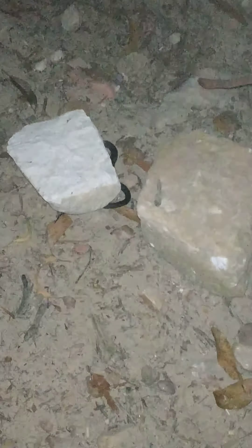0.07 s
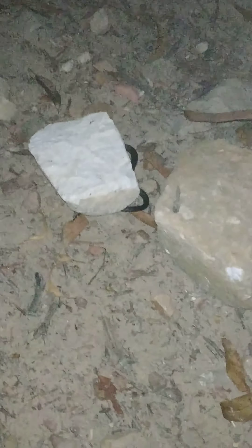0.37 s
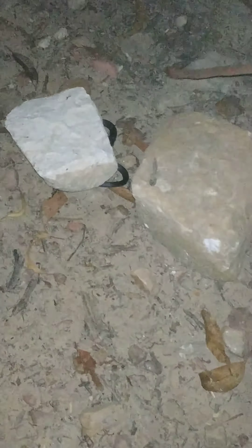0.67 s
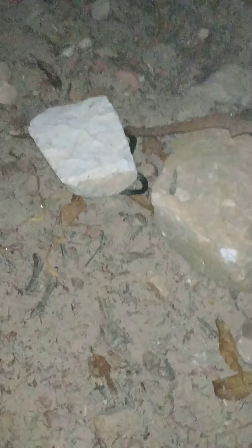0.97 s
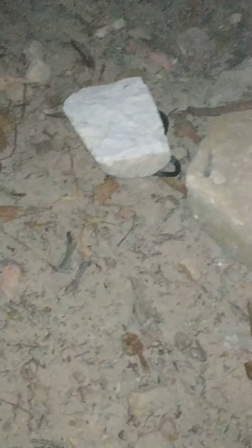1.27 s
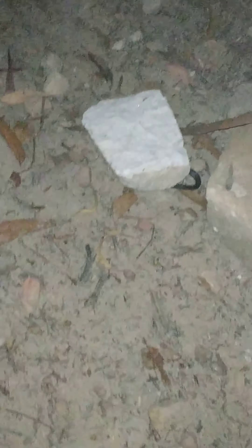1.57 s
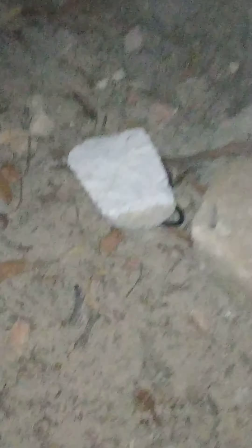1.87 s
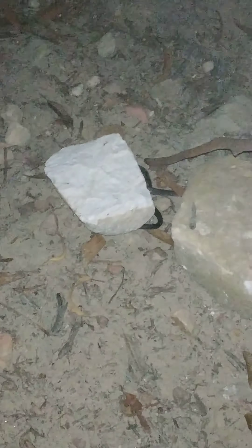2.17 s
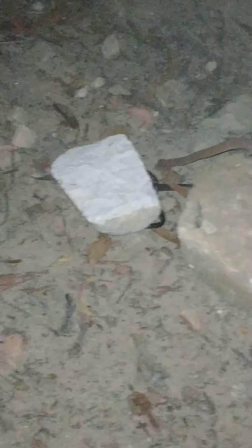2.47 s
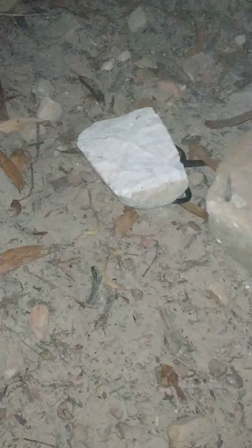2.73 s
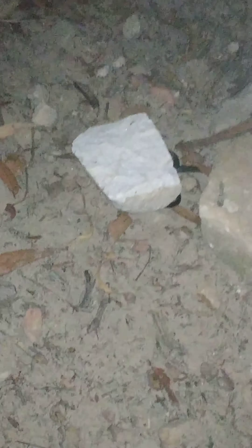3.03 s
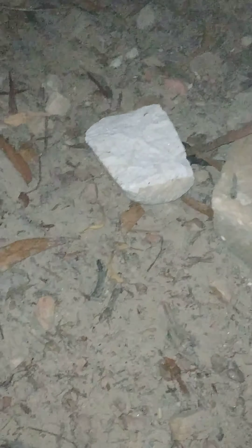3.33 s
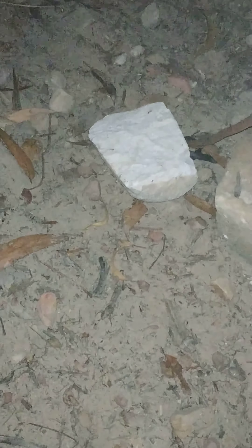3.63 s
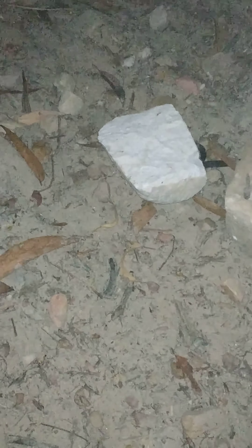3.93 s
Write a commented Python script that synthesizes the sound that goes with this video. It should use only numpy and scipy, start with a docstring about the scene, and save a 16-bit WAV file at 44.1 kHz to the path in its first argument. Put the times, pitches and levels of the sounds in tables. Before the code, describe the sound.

Night crickets trill in short pulses over a faint hum, then wind buffets the microphone.

```python
"""Night crickets on stony ground

One low cricket and several higher ones chirp over a far chorus, each wing stroke a short falling tone.
A distant motor drones under the quiet air. Close by come a few small clicks, two soft rustles and thin
squeaks; near the end a puff of wind buffets the microphone, mostly on the left."""
import sys
import numpy as np
from scipy import signal
from scipy.fft import rfft, irfft
from scipy.io import wavfile

SR = 44100
rng = np.random.default_rng(int(sys.argv[2]) if len(sys.argv) > 2 else 0)


def wrap_up_sound(samples):
    """Save the sound to the file named by the first command line argument, as 16-bit audio."""
    columns = np.atleast_2d(samples).T
    # keep every value between -1 and 1, then stretch to whole-number steps
    tamed = np.clip(columns, -1, 1)
    steps = np.round(tamed * 32767).astype(np.int16)
    wavfile.write(sys.argv[1], SR, steps)


N = 176400
TIME = np.arange(N) / SR


def from_db(db):
    """Decibels to gain."""
    return 10 ** (np.asarray(db) / 20)


def unit_rms(x):
    """Scale to unit power."""
    return x / np.sqrt(np.mean(x ** 2) + 1e-20)


def automation(rows):
    """Each column of a breakpoint curve at every sample."""
    times, *columns = np.transpose(rows)
    return [np.interp(TIME, times, column) for column in columns]


def at_hz(points, hz):
    """Read a spectrum on a log-frequency axis."""
    freqs, values = np.transpose(points)
    return np.interp(np.log(hz), np.log(freqs), values)


def pan(db):
    """Constant-power stereo gains; positive is left."""
    return unit_rms(from_db(np.array([[db], [-db]]) / 2))


def drift(rate_hz):
    """Smooth random modulation, spread 1."""
    hop, settle = 40, 2000
    pole = np.exp(-2 * np.pi * rate_hz * hop / SR)
    noise = rng.standard_normal(N // hop + settle + 2)
    slow = signal.lfilter([1], [1, -2 * pole, pole * pole], noise)[settle:]
    return np.interp(np.arange(N) / hop, np.arange(len(slow)), unit_rms(slow))


def band(x, hz, width_hz):
    """Band-pass around a centre."""
    edges = [hz - width_hz / 2, hz + width_hz / 2]
    return signal.sosfilt(signal.butter(2, edges, "band", fs=SR, output="sos"), x + 1e-18)


def phase_of(hz):
    """Running phase of a moving pitch."""
    return 2 * np.pi * np.cumsum(hz) / SR


def shaped_noise(spectrum, correlation=None):
    """Stereo noise with a given colour and left-right correlation; rms 1."""
    hz = np.maximum(np.fft.rfftfreq(N, 1 / SR), 1)
    mid, side = rfft(rng.standard_normal((2, N)))
    alike = at_hz(correlation, hz) if correlation else 0
    stereo = np.sqrt(1 + alike) * mid + np.sqrt(1 - alike) * side * [[1], [-1]]
    gain = from_db(at_hz(spectrum, hz)) * (hz > 10)
    return unit_rms(irfft(gain * stereo, N))


def glide(curve, wobble=0, harmonic=1):
    """A sine that follows a curve of pitch and level, silent outside it."""
    hz, db = automation(curve)
    gate = (TIME > curve[0][0]) & (TIME < curve[-1][0])
    phase = phase_of(hz * (1 + wobble * drift(120)))
    return gate * from_db(db) * np.sqrt(2) * np.sin(harmonic * phase)


# Colour of the air: f/Hz, relative level/dB
AIR_COLOUR = [(25, 4), (60, 3), (125, -5.5), (200, -11.5), (350, -17.5), (600, -20), (1000, -17.5),
              (1350, -24.5), (2000, -29.5), (2800, -33), (5000, -35), (9500, -36.5), (14000, -36)]
# Its fader: t/s, level/dB
AIR_FADER = [(0, -55), (.6, -55), (1.8, -55), (2.2, -56), (3, -56.5), (4, -55)]
# Its stereo image: f/Hz, left-right correlation/-1..1
AIR_CORRELATION = [(30, 0.86), (100, 0.96), (300, 0.81), (600, 0.31), (1000, -0.46), (1500, -0.22),
                   (2300, 0.052), (4000, 0.029), (14000, 0.029)]


def night_air():
    """A dark, quiet noise bed, centred in the bass and wide above."""
    return from_db(automation(AIR_FADER)[0]) * shaped_noise(AIR_COLOUR, AIR_CORRELATION)


# Motor drone: t/s, firing rate/Hz, fundamental level/dB, overtone level/dB
MOTOR_DRONE = [(0, 81.3, -53.5, -66.5), (.35, 87.36, -57, -66.5), (.7, 81.87, -61, -68.5),
               (.85, 79.08, -56, -69), (1.12, 75.72, -51.5, -64), (1.25, 74.86, -61, -67),
               (1.45, 66, -56.5, -70.5), (1.75, 61.72, -74, -58.5), (1.95, 61.3, -60.5, -74),
               (2.2, 62.5, -58, -65.5), (2.65, 63, -56.5, -63.5), (3, 66, -63, -69.5),
               (3.5, 67.96, -62.5, -67), (4, 68.2, -54, -67)]
# Its overtones: harmonic number, trim/dB
MOTOR_OVERTONES = [(2, -2), (3, -14.5), (4, -17)]


def far_motor():
    """A motor hums at its firing rate, each harmonic wavering in level on its own."""
    wobble, flutter_db = .00816, 1.5
    firing_hz, fundamental_db, overtones_db = automation(MOTOR_DRONE)
    phase = phase_of(firing_hz * (1 + wobble * drift(6.9)))
    hum = from_db(fundamental_db + flutter_db * drift(1.3)) * np.sin(phase)
    for harmonic, trim_db in MOTOR_OVERTONES:
        hum += from_db(overtones_db + trim_db + flutter_db * drift(5.2)) * np.sin(harmonic * phase)
    return np.sqrt(2) * hum


# Far tones, one curve each: t/s, f/Hz, level/dB
FAR_TONE_CURVES = [
    [(.05, 256.6, -83), (.22, 261.3, -70), (.42, 266, -62.5), (.52, 263, -66), (.64, 255.3, -92)],
    [(0, 426, -76), (.13, 408, -72.5), (.25, 432, -85)],
]


def far_tones():
    """Two faint low glides, each with a softer octave on top."""
    return sum(glide(curve) + from_db(-10.5) * glide(curve, harmonic=2) for curve in FAR_TONE_CURVES)


def chirps(rows, stroke):
    """Each wing stroke is a swelling tone that falls as the wing slows; a chirp starts softly."""
    length_s, top_hz, fall_hz, bend, soft_start_db = stroke
    wobble = 1 + .008 * drift(150)
    rasp = 1 + .2 * drift(240)
    out = np.zeros(N)
    for first_s, count, spacing_s, db in rows:
        for k in range(count):
            begin = first_s + k * spacing_s - length_s / 2
            span = np.arange(max(int(begin * SR), 0), min(int((begin + length_s) * SR), N))
            progress = np.clip((span / SR - begin) / length_s, 0, 1)
            hz = (top_hz - fall_hz * progress ** bend) * wobble[span]
            gain = from_db(db - soft_start_db * .5 ** k + .7 * rng.normal())
            swell = np.sin(np.pi * progress) ** 2
            out[span] += gain * np.sqrt(2) * swell * rasp[span] * np.sin(phase_of(hz))
    return out


# Far chorus fader: t/s, level/dB
CHORUS_FADER = [(0, -78), (.26, -79), (.45, -73.5), (.63, -72.5), (.8, -79.5), (.92, -70.5), (1.2, -77),
                (1.31, -71.5), (1.43, -75), (1.55, -73), (1.9, -77.5), (2.1, -70.5), (2.33, -80.5),
                (2.7, -71), (2.95, -78), (3.35, -69.5), (3.56, -78), (3.82, -74.5), (3.96, -68.5)]
# Its wing stroke: length/s, top f/Hz, fall/Hz, bend exponent, soft start/dB
CHORUS_WING = (0.011, 4480, 710, 1.28, 2)


def far_chorus(chirps_per_side=70):
    """Overlapping high chirps on each side, over the blurred song of the farthest crickets."""
    sides = []
    for _ in range(2):
        rows = []
        for k, (jitter, slowness, softness) in enumerate(rng.random((chirps_per_side, 3))):
            first_s = (k + jitter) / chirps_per_side * (N / SR + .1) - .15
            rows.append((first_s, 4, .036 + .009 * slowness, -4 * softness))
        sides.append(unit_rms(chirps(rows, CHORUS_WING)))
    wash = unit_rms(band(rng.standard_normal((2, N)), hz=4160, width_hz=470))
    return from_db(automation(CHORUS_FADER)[0] - 3.5) * (np.array(sides) + wash)


# Fader of the far low crickets: t/s, level/dB
FAR_LOW_FADER = [(0, -83), (.6, -82), (.75, -94), (1.0, -86), (1.15, -85.5), (1.9, -78), (2.1, -92),
                 (2.18, -81), (2.5, -82), (2.62, -96), (3.1, -81.5), (3.45, -79), (3.72, -84), (3.85, -90),
                 (4, -94)]


def far_low_crickets():
    """Lower song, blurred by distance to a narrow band of noise."""
    wash = unit_rms(band(rng.standard_normal((2, N)), hz=3376, width_hz=102))
    return from_db(automation(FAR_LOW_FADER)[0]) * wash


# Wind fader: t/s, level/dB
WIND_FADER = [(0, -52), (.2, -53), (.6, -69), (1.4, -64), (2.3, -69), (3.0, -51.5), (3.06, -39),
              (3.125, -41.5), (3.18, -34), (3.25, -44), (3.32, -36.5), (3.43, -36), (3.47, -46),
              (3.53, -35), (3.6, -45.5), (3.78, -45.5), (3.87, -50), (4, -39)]
# Colour of the rumble: f/Hz, relative level/dB
WIND_COLOUR = [(20, -8), (50, 6), (90, 2.5), (150, -7), (220, -17), (320, -27), (600, -55.5), (1200, -63)]
# Single eddies: t/s, peak level/dB, half width/s
EDDIES = [(3.051, -29, .003), (3.184, -25.5, 0.0025), (3.294, -23.5, 0.0041), (3.3178, -21, 0.0019),
          (3.338, -25, 0.0032), (3.4, -31.5, 0.0095), (3.535, -28, 0.0037), (3.77, -27, 0.0044)]


def wind(lumps_db=4, right_db=-13):
    """Lumpy low turbulence on the microphone, with single eddies thumping the left port."""
    out = from_db(automation(WIND_FADER)[0] + lumps_db * drift(50)) * shaped_noise(WIND_COLOUR)
    for at_s, db, half_width_s in EDDIES:
        offset = (TIME - at_s) / half_width_s
        thump = (1 - offset ** 2) / (1 + (offset / 2) ** 2) ** 4.5  # a peak between two dips
        out[0] += from_db(db) * thump
    return out * from_db([[0], [right_db]])


# Faders, one per rustle: t/s, level/dB
RUSTLE_FADERS = [
    [(.5, -85), (.65, -69.5), (.85, -73), (1.1, -85)],
    [(1.4, -89), (1.49, -66.5), (1.7, -71.5), (1.9, -69.5), (2.02, -85)],
]
# Colours, one per rustle: f/Hz, relative level/dB
RUSTLE_SPECTRA = [
    [(900, 2), (1900, -9), (2250, 10), (2700, -20), (5500, -2), (9500, -9), (12300, 6), (14500, -2)],
    [(500, -15), (1000, 13), (1400, -2), (1900, 4), (2170, 12.5), (2380, 3), (2700, -10), (3900, -0.5),
     (9000, -4.5), (14000, 1.5)],
]


def rustles(flicker_db=3):
    """Two soft swells of flickering noise, close on the left."""
    out = 0
    for fader, colour in zip(RUSTLE_FADERS, RUSTLE_SPECTRA):
        envelope = from_db(automation(fader)[0] + flicker_db * drift(25))
        out += envelope * shaped_noise(colour)
    return pan(db=9) * out


# Squeaks, one curve each: t/s, f/Hz, level/dB
SQUEAK_CURVES = [
    [(1.43, 11600, -85), (1.47, 11900, -74), (1.5, 13000, -71), (1.51, 13200, -90)],
    [(1.765, 13580, -85), (1.795, 13160, -78), (1.812, 12720, -68), (1.835, 12600, -73), (1.86, 13020, -69),
     (1.885, 12830, -67), (1.92, 12320, -70), (1.96, 11000, -85)],
]


def squeaks():
    """Two thin, unsteady glides, very high and well to the left."""
    return pan(db=21) * sum(glide(curve, wobble=.004) for curve in SQUEAK_CURVES)


# Clicks: t/s, snap/dB, crackle/dB, decay/s, pan/dB, resonances (f/Hz, width/Hz, relative level/dB)
CLICK_HITS = [(.2326, -43, -65, 0.00035, 15, [(7850, 3000, 0.5), (13800, 1500, 2)]),
              (1.2758, -43, -63, 0.0041, 5.5, [(1050, 560, 0), (2150, 330, 3), (4060, 1000, 2),
              (11000, 2200, -7)]), (1.489, -57, -60, 0.0067, 7, [(3350, 790, -7)]),
              (3.1018, -56, -69, .002, 5.3, [(3550, 798, 13), (4720, 1300, 16.5)])]


def clicks(low_cut_hz=590):
    """Each click is a snap and a short dying crackle that set broad resonances ringing."""
    out = 0
    for at_s, snap_db, crackle_db, decay_s, pan_db, resonances in CLICK_HITS:
        decay = (TIME >= at_s) * np.exp(-np.minimum(abs(TIME - at_s) / decay_s, 20))
        crack = from_db(crackle_db) * rng.standard_normal((2, N)) * decay
        crack[:, int(at_s * SR)] += from_db(snap_db)
        ring = 0
        for hz, width_hz, db in resonances:
            makeup_gain = np.sqrt(SR / 2 / width_hz)
            ring += from_db(db) * makeup_gain * band(crack, hz, width_hz)
        out += pan(pan_db) * (crack + ring)
    return signal.sosfilt(signal.butter(2, low_cut_hz, "high", fs=SR, output="sos"), out)


def reflections(x, t60_s=.2):
    """Diffuse scatter from stones and bushes, different on each side."""
    t = TIME[:SR // 2]
    tails = rng.standard_normal((2, len(t))) * from_db(-60 * t / t60_s)
    return np.array([signal.fftconvolve(x, tail / np.linalg.norm(tail))[:N] for tail in tails])


def placed(x, pan_db, left_lag_s=.00002, send_db=-12):
    """Pan a source, the left ear slightly late, and add its reflections."""
    left = np.interp(TIME - left_lag_s, TIME, x)
    return pan(pan_db) * np.array([left, x]) + from_db(send_db) * reflections(x)


# Chirps of the near crickets: first stroke t/s, stroke count, spacing/s, level/dB
LOW_SONG = [(.286, 9, .0364, -66.5), (1.716, 6, .0356, -67.5), (3.151, 7, .038, -68.5)]
HIGH_SONG = [(.312, 4, 0.042, -63.5), (.340, 3, .0425, -65), (.869, 4, 0.038, -63), (1.049, 3, .045, -72),
             (1.245, 3, 0.027, -69), (1.514, 3, 0.043, -63), (1.695, 4, 0.047, -68),
             (2.077, 4, 0.044, -61.5), (2.401, 3, 0.038, -74.5), (2.776, 2, 0.041, -61.5),
             (3.025, 2, .046, -71), (3.382, 2, .0435, -61), (3.643, 3, 0.039, -71), (3.912, 3, .042, -63.5)]
# Their wing strokes: length/s, top f/Hz, fall/Hz, bend exponent, soft start/dB
LOW_WING = (0.034, 3410, 334, 2.9, 4.2)
HIGH_WING = (0.016, 4538, 777, 1.19, 6.2)


def near_crickets():
    """Long chirps from the low cricket ahead, short ones from the higher crickets to the right."""
    low = placed(chirps(LOW_SONG, LOW_WING), pan_db=-.3)
    high = placed(chirps(HIGH_SONG, HIGH_WING), pan_db=-5)
    return low + high


def scene():
    """The crickets over the night bed, with close details and wind."""
    crickets = near_crickets() + far_chorus() + far_low_crickets()
    bed = night_air() + far_motor() + far_tones()
    return crickets + bed + clicks() + squeaks() + rustles() + wind()


def record(dry):
    """A steep high cut on the whole mix."""
    high_cut_hz = 14350
    return signal.sosfilt(signal.ellip(10, .2, 60, high_cut_hz, fs=SR, output="sos"), dry)


dry = scene()
out = record(dry)
wrap_up_sound(out)
```